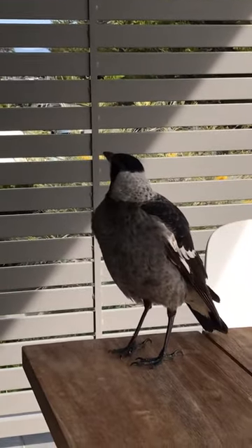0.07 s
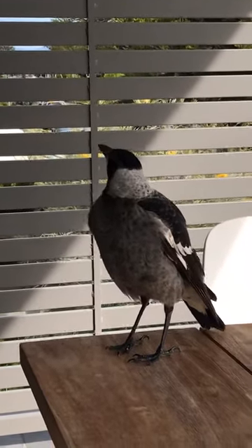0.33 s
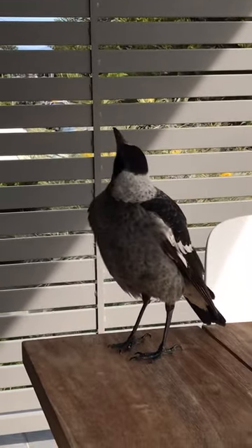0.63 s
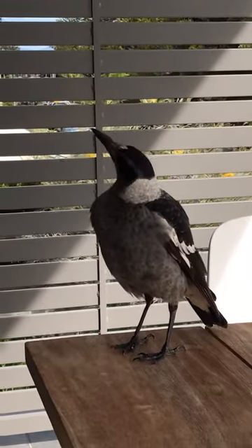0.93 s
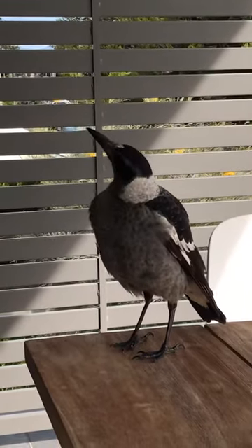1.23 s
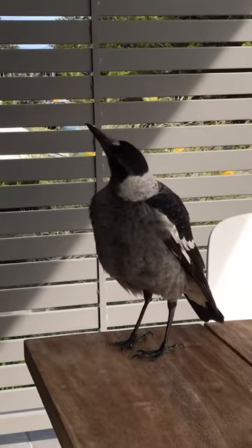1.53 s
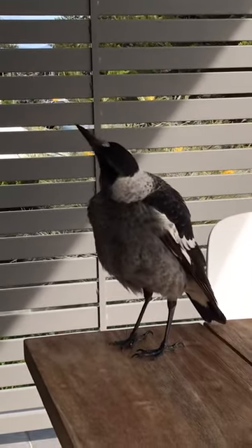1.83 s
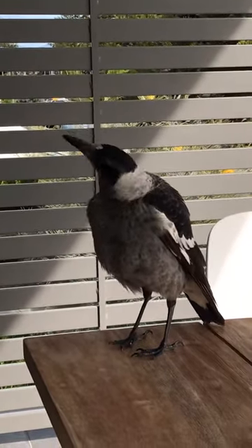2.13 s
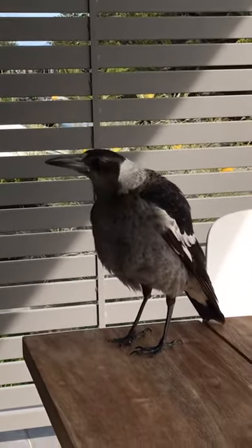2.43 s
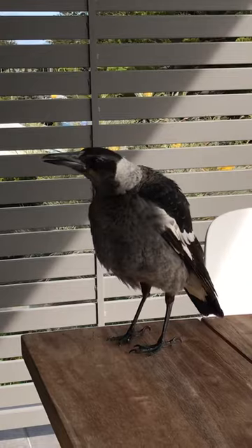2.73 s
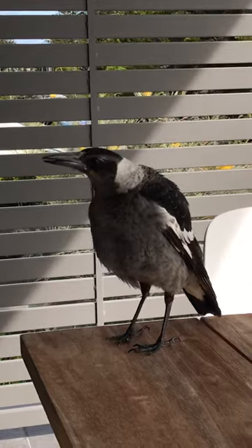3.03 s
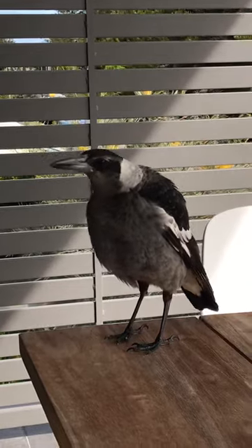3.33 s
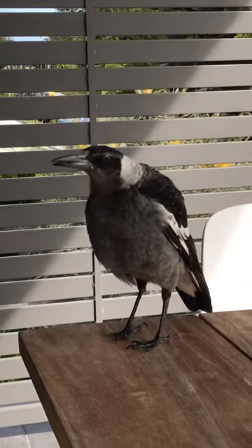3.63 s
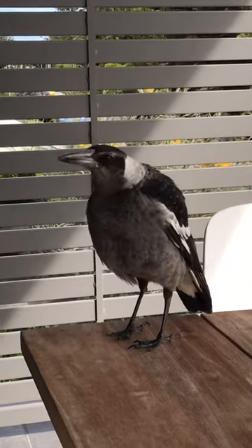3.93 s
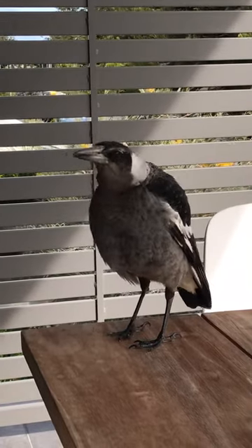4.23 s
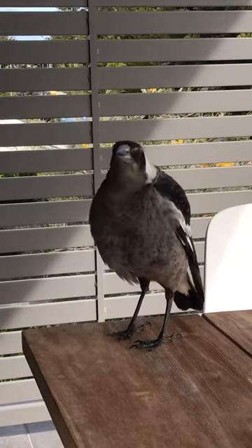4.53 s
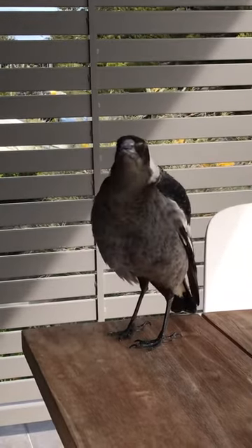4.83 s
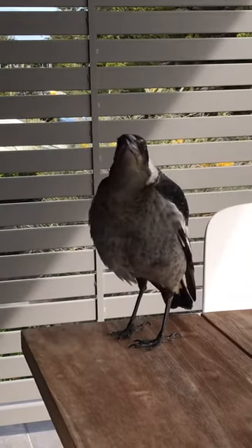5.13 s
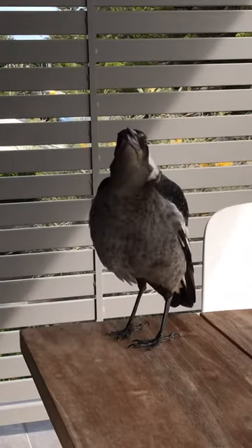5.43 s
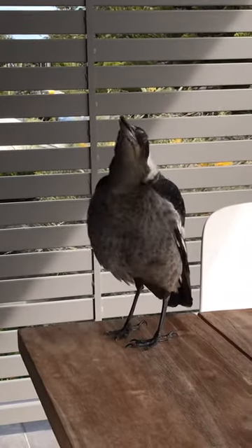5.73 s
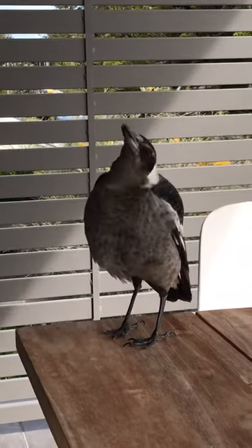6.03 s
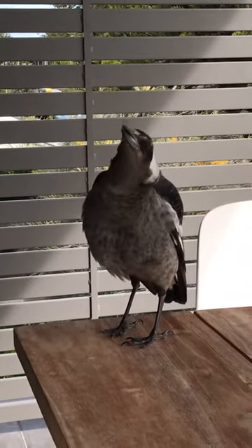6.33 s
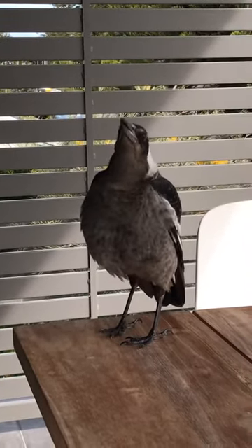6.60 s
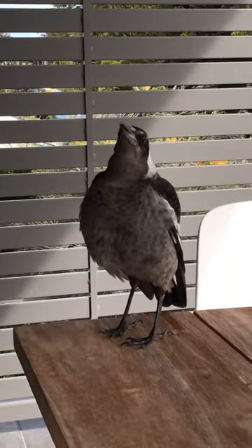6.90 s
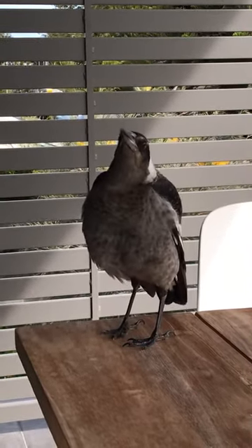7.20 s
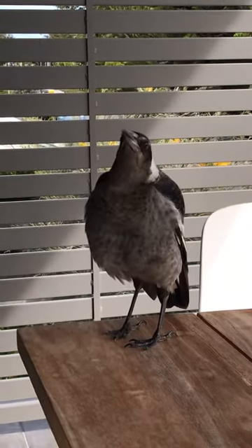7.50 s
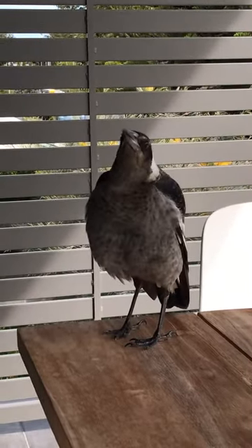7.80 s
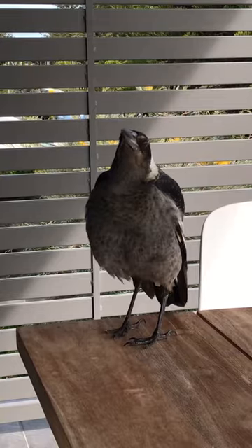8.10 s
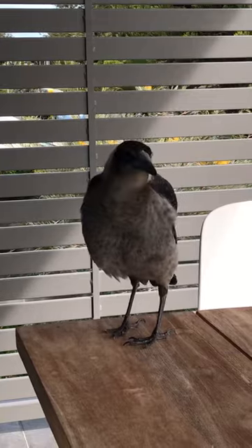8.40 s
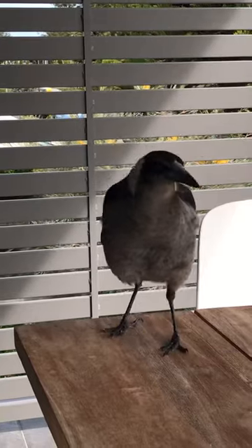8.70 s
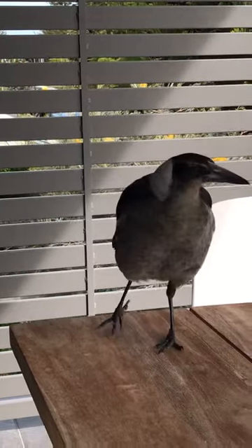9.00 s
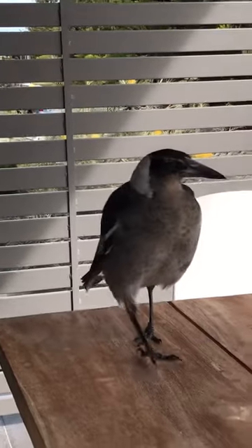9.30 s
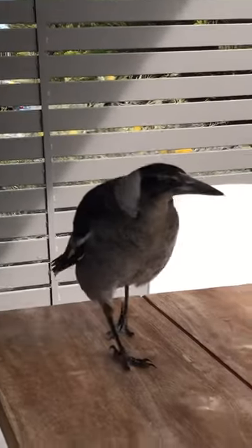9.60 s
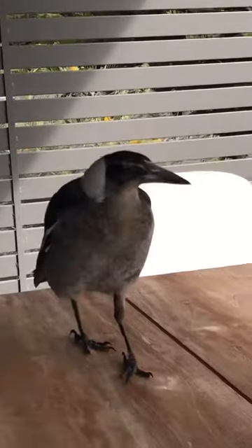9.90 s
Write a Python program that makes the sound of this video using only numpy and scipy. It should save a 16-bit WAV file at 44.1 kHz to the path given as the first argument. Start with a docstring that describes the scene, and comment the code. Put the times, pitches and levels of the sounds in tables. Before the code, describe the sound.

A magpie sings close by on a porch, over a steady low outdoor rumble with faint hiss. It starts with soft, broken warbles and a few held notes, with one dry tick of the beak. A trill leads into louder, buzzy, fluttering calls, then a whistle, a short yelp and a falling note. The song has a short echo and stops, leaving only the background.

```python
"""A magpie carols on a wooden porch table: soft broken warbles that grow into louder, buzzy calls.
The two sides of its voice box (the syrinx) sing in turn or together, each a nearly pure tone that
flutters. An open beak lets out the overtones, the higher tones that make a note bright.
Beak and claws tick, the slatted porch adds a short echo, and a low outdoor rumble with a little
hiss lies under it all."""
import sys
import numpy as np
from scipy import signal
from scipy.fft import rfft, irfft, next_fast_len
from scipy.io import wavfile
from scipy.ndimage import map_coordinates

SR = 44100
rng = np.random.default_rng(int(sys.argv[2]) if len(sys.argv) > 2 else 0)


def file_out(sig):
    """Save sig as 16-bit WAV at sys.argv[1]."""
    # one column per channel
    cols = np.atleast_2d(sig).T
    # limit, then scale
    lim = np.clip(cols, -1, 1)
    pcm = np.round(lim * 32767).astype(np.int16)
    wavfile.write(sys.argv[1], SR, pcm)


N = 438794
TIME = np.arange(N) / SR
TOP_HZ = 15700  # where the treble ends

# The outdoor background. Each row: frequency in Hz, relative level in dB.
AIR_COLOUR = [(22, -22.5), (48, -14.5), (63, -4), (74, 1), (92, -9), (120, -9.5), (180, -18), (450, -25),
              (900, -22.5), (2000, -33.5), (9000, -53.5), (10400, -60), (12000, -56.5), (15700, -63.5)]
# How it eases off. Each row: time in seconds, boost in dB.
AIR_FADE = [(0, 4.5), (2.5, 3), (9, 2)]
# The soft notes. Each row: start and length in seconds, pitch in Hz, relative level in dB.
WARBLES = [(1.723, .065, 1010, -38), (1.807, .05, 1320, -37.5), (1.875, .105, 1075, -35.5),
           (2.009, .03, 740, -37), (2.024, .056, 1080, -35), (2.075, .048, 780, -34.5),
           (2.184, .03, 1160, -38), (2.205, .062, 810, -38), (2.261, .058, 1005, -35.5),
           (2.27, .054, 725, -35), (2.701, .029, 1448, -22.5), (2.974, .085, 845, -31.5),
           (3.172, .055, 815, -29), (3.238, .024, 820, -29.5), (3.266, .038, 1295, -33),
           (3.3, .072, 1100, -33), (3.374, .063, 745, -35), (3.442, .042, 800, -26.5),
           (3.484, .066, 975, -30), (3.589, .023, 1070, -24.5), (3.613, .057, 1185, -32.5),
           (3.67, .095, 800, -36.5), (3.785, .037, 1110, -29), (3.822, .053, 1205, -31),
           (3.885, .021, 1035, -25), (3.906, .036, 945, -34.5), (4.222, .051, 875, -29),
           (4.273, .029, 750, -37), (4.309, .072, 1140, -34), (4.382, .069, 720, -30),
           (4.457, .093, 785, -40.5), (4.551, .05, 1075, -29), (4.565, .073, 1305, -32),
           (4.626, .072, 920, -34), (5.813, .057, 755, -37.5), (6.497, .038, 1410, -30.5),
           (6.857, .06, 943, -30.5), (6.924, .043, 775, -37)]
# The resting throat. Each row: frequency in Hz, overtone gain in dB with the beak open, then shut.
THROAT_COLOUR = [(1795, -3.5, -27.5), (2320, -28, -33.5), (3250, -29.5, -35.5), (4164, -4, -34.5),
                 (5030, -37, -49.5), (6390, -26, -43), (7720, -50, -62), (8520, -37.5, -41),
                 (10730, -49, -66.5), (12400, -29.5, -45.5), (13100, -36, -51), (14700, -62, -49)]
# Sheen is a boost or cut of the top overtones. Each row: frequency in Hz, share of it from 0 to 1.
SHEEN_SHARE = [(6800, 0), (8500, 1)]
# The extra tones made when both sides sing at once. Each row: frequency in Hz, gain in dB.
CLASH_COLOUR = [(1300, -27.5), (2100, -5.5), (2600, 0.5), (4600, -3), (7000, -13)]
# The porch echo. Each row: frequency in Hz, seconds it takes to fade by 60 dB.
ECHO_DECAY = [(1200, 0.55), (4500, 0.36), (12000, 0.084)]
# The long calls. Each row: time in seconds, relative level in dB, pitch in Hz,
# brightness in dB (which sets how far the beak opens).
HELD = [(2.32, -32.5, 999, -41), (2.378, -27, 987, -30.5), (2.482, -28, 1013, -23.5),
        (2.538, -34.5, 1006, -26), (2.598, -25.5, 1006, -29.5), (2.63, -51, 1015, -25)]
HIGH_BUZZ = [(2.73, -40.5, 1447, -15.5), (2.738, -31, 1442, -25.5), (2.792, -31.5, 1350, -25),
             (2.952, -30, 1294, -23), (2.975, -47, 1316, -33.5)]
TRILL = [(4.69, -39, 1308, -25), (4.73, -24.5, 1293, -25), (4.78, -35, 1239, -21), (4.848, -27, 1227, -20),
         (4.976, -29.5, 1114, -24.5), (5.0, -45, 1128, -25.5)]
LOUD_CALL = [(5.11, -32.5, 1080, -44), (5.132, -53, 1090, -22), (5.162, -21, 1076, -37),
             (5.178, -19, 1066, -41), (5.194, -41, 1058, -31), (5.216, -17, 1064, -29.5),
             (5.246, -19.5, 1067, -18), (5.31, -19, 1051, -21), (5.4, -26.5, 1048, -11.5),
             (5.432, -21, 1035, -21.5), (5.478, -29.5, 1079, -19.5), (5.508, -26.5, 1078, -21),
             (5.59, -39.5, 1045, -11)]
LOUD_UPPER = [(5.44, -38, 1540, -8), (5.498, -33, 1570, -11), (5.586, -25, 1479, -25),
              (5.63, -34, 1470, -26.5), (5.64, -36, 1480, -21.5)]
PEAK_CALL = [(5.62, -34.5, 1114, -29), (5.672, -20.5, 1100, -9), (5.734, -20.5, 1089, -7),
             (5.76, -22, 1067, -19.5), (5.775, -24, 1075, -24)]
WHISTLE = [(6.045, -40, 1168, -30), (6.061, -33.5, 1184, -25), (6.119, -28.5, 1167, -26.5),
           (6.2, -40.5, 1112, -25.5)]
PURR = [(6.315, -36, 1079, -36), (6.341, -24, 1079, -27), (6.455, -28, 1081, -26), (6.47, -34, 1081, -14.5)]
FALL = [(6.51, -18.5, 1040, -15.5), (6.54, -21, 1039, -18.5), (6.644, -19.5, 906.5, -28),
        (6.666, -28.5, 910.6, -28.5), (6.756, -24, 910.4, -40), (6.85, -40, 860, -28.5)]
FALL_UPPER = [(6.52, -58, 1854, -36), (6.648, -39, 1634, -22), (6.73, -52, 1620, -29)]
# How each call is sung. Each row: its table, flutter rate in Hz, flutter depth from 0 to 1 with
# the beak wide open, throat tuning (1 is at rest), sheen in dB.
CALLS = [(HELD, 124, .58, 0.95, -1.3), (HIGH_BUZZ, 117, .85, 0.947, -5), (TRILL, 72, .7, 0.926, 0),
         (LOUD_CALL, 132, 0.377, .98, -5.5), (LOUD_UPPER, 76, 0.573, 0.98, 1),
         (PEAK_CALL, 153, 0.5, 1, 4.4), (WHISTLE, 57, 0.094, 0.93, -3), (PURR, 82, 0.2, 0.97, -7),
         (FALL, 78, 0.735, 0.98, 7.8), (FALL_UPPER, 63, 0.374, 0.74, 0)]
# Bright squeaks inside the notes. Each row: time in seconds, frequency in Hz, boost in dB.
SQUEAKS = [(2.585, 4107, 6), (3.01, 6400, 17), (3.5, 8200, 18), (3.895, 8600, 14), (6.88, 5740, 20)]
# Dry ticks of beak and claws. Each row: start in seconds, relative level in dB.
TICKS = [(4.112, -23), (9.711, -48)]
# Their tone. Each row: frequency in Hz, gain in dB.
TICK_COLOUR = [(1500, -31), (4500, -3), (15000, -34)]
# One clean yelp. Each row: time in seconds, pitch in Hz, relative level in dB.
YELP = [(6.462, 829, -42), (6.475, 905, -26), (6.491, 936, -24), (6.518, 916, -44)]
# The gain in dB of each tone in the yelp, from the lowest up.
YELP_HARMONICS = [-6, 2.5, -24, -13.5, -11.5, -22.5, -32, -40, -21.5, -32, -40, -38, -38]


def amp(db):
    """Turns decibels into a number to multiply by."""
    return 10 ** (np.asarray(db) / 20)


def unit(x):
    """Scales a signal to an average size (rms) of 1."""
    return x / np.sqrt(np.mean(x ** 2) + 1e-20)


def look_up(points, hz):
    """Reads between the rows of a table, giving every octave equal room."""
    f, value = np.transpose(points)
    return np.interp(np.log(hz + 1), np.log(f), value)


def colour(x, points):
    """Turns each frequency up or down by a table of Hz and dB."""
    size = next_fast_len(len(x) + 4096)
    gain = amp(look_up(points, np.fft.rfftfreq(size, 1 / SR)))
    return irfft(rfft(x, size) * gain, size)[:len(x)]


def lowpass(hz):
    """A filter that keeps what lies below hz."""
    return signal.butter(2, hz, fs=SR, output="sos")


def wander(hz):
    """A smooth random wobble, moving up to about hz times a second."""
    return unit(signal.sosfilt(lowpass(hz), rng.standard_normal(N)))


def bump(x, width):
    """A smooth hill of height 1 around zero."""
    return np.exp(-(x / width) ** 2 / 2)


def outdoors(gain_db=-43, waver_db=.43):
    """A low rumble and a faint, wavering hiss ease off together."""
    air = unit(colour(rng.standard_normal(N), AIR_COLOUR))
    rumble = signal.sosfiltfilt(lowpass(220), air)
    hiss = (air - rumble) * amp(waver_db * wander(3.9))
    return (rumble + hiss) * amp(gain_db + np.interp(TIME, *np.transpose(AIR_FADE)))


def warble(start, length, hz, level_db, flutter_hz=107.2, easy_db=-32.5, open_db=-11, open_hz=1052.3):
    """One push of air shapes a note: a strong one rises and rings clean, a weak one sags and flutters."""
    push_db = level_db - easy_db
    glide = min(.011 * push_db, .06) / 2
    depth = np.clip(.52 - .08 * push_db, 0, .56) * np.sqrt(open_hz / hz)  # low notes flutter more
    beak = amp(level_db - open_db) * (hz / open_hz) ** 2  # opens for loud and high notes
    place = np.linspace(-1, 1, 7)  # from the note's start to its end
    times = start + length * (place + 1) / 2
    arched_db = level_db + .5 * (1 / 3 - place ** 2)
    pitch = hz * (1 + glide * place)
    return np.column_stack(np.broadcast_arrays(times, arched_db, pitch, flutter_hz, depth, beak, 1, 0))


def share_notes(notes):
    """Each note goes to the side of the syrinx that is free first."""
    resting, other = [], []
    for note in sorted(notes, key=lambda note: note[0, 0]):
        resting.append(note)
        if not other or other[-1][-1, 0] < note[-1, 0]:
            resting, other = other, resting
    return resting, other


def join_notes(notes, edge_s=.014):
    """Joins one side's notes into curves: loudness first, then the other controls of the voice."""
    loudness = sum(np.interp(TIME, note[:, 0], amp(note[:, 1]), left=0, right=0) for note in notes)
    ramp = signal.windows.hann(round(2 * edge_s * SR))
    loudness = signal.oaconvolve(loudness, ramp / ramp.sum(), "same")
    times, _, *controls = np.transpose(sorted(map(tuple, np.vstack(notes))))
    return loudness, *(np.interp(TIME, times, control) for control in controls)


def syrinx(notes, throb=.95, bend=.135, lag_radians=1.9, steady_db=-19, pure_db=14):
    """On one side of the voice box a thin skin vibrates, fluttering in strength and pitch together."""
    loudness, pitch, flutter_hz, depth, beak, tuning, sheen_db = join_notes(notes)
    depth, beak = np.clip(depth, 0, 1), np.clip(beak, 0, 1)
    # Loud notes with an open beak flutter more evenly.
    uneven = depth * (1 - .739 * beak) / (1 + (loudness / amp(steady_db)) ** 2)
    flutter = 2 * np.pi * np.cumsum(flutter_hz * (1 + .55 * uneven * wander(50.2))) / SR
    swing = bend * depth * np.cos(flutter - lag_radians)
    hz = pitch * (1 + swing + .07 * uneven * wander(108.5) + .00396 * wander(27.35))
    phase = 2 * np.pi * np.cumsum(hz) / SR + .12 * depth * wander(430)  # jitter frays high overtones
    pulsing = 1 + throb * depth * np.cos(flutter) + .55 * uneven * wander(195)
    strength = np.sqrt(2) * loudness * pulsing / np.sqrt(1 + (throb * depth) ** 2 / 2)
    singing, overtones = loudness > 1e-6, np.zeros(N)
    overtones[singing] = sum(np.cos(k * phase[singing]) * (k * hz[singing] < TOP_HZ)
                             for k in range(2, 22))
    overtones += 2.9 * np.sqrt(depth * beak) * rng.standard_normal(N)  # forced air rasps
    calm = np.maximum(1 - 2 * (depth + beak), 0)  # calm notes with a shut beak are almost pure
    overtones *= strength * amp(-pure_db * calm)
    main_tone = tuned_cavity(strength * np.exp(1j * phase), pitch)
    return main_tone + throat(overtones, pitch, beak, tuning, sheen_db)


def tuned_cavity(tone, pitch, reach_hz=340, below_hz=75):
    """The bird keeps the hollow of its throat tuned just under the pitch, which softens the flutter."""
    centre = np.exp(2j * np.pi * np.cumsum(pitch - below_hz) / SR)
    return (centre * signal.sosfiltfilt(lowpass(reach_hz), tone / centre)).real


def throat(overtones, pitch, beak, tuning, sheen_db, rest_hz=1060, glint_db=5.5, glint_hz=11000):
    """Throat and beak favour some overtones; their peaks slide with the pitch and shift restlessly."""
    f, t, spectrum = signal.stft(overtones, SR, nperseg=256, noverlap=192)
    hz = f[:, None]
    curves = pitch, beak, tuning, sheen_db, wander(5.7)
    pitch, beak, tuning, sheen_db, drift = (np.interp(t, TIME, curve) for curve in curves)
    stretch = tuning * (pitch / rest_hz) ** .25 * (1 + .06 * (1 - beak) ** 2 * drift)
    table_hz, table = hz / stretch, np.array(THROAT_COLOUR)
    open_db, shut_db = look_up(table[:, [0, 1]], table_hz), look_up(table[:, [0, 2]], table_hz)
    gain_db = beak * open_db + (1 - beak) * shut_db
    gain_db += glint_db * glints(t, table_hz) * (1 - beak / 2) * np.minimum(hz / glint_hz, 1)
    gain_db += squeak_db(t, hz) + sheen_db * look_up(SHEEN_SHARE, hz)
    above_pitch = np.clip(hz / pitch - 1, 0, 1)
    return signal.istft(spectrum * amp(gain_db) * above_pitch, SR, nperseg=256, noverlap=192)[1][:N]


def glints(t, hz, life_s=.11, width_hz=620):
    """Narrow random peaks and dips come and go, so the overtones flicker."""
    grid = rng.standard_normal((64, round(N / SR / life_s) + 2))
    places = np.broadcast_arrays(hz / width_hz, t / life_s)
    return unit(map_coordinates(grid, places, order=2, mode="mirror"))


def carol(clash_db=9):
    """Both sides share one airflow, so singing together they also make hoarse extra tones."""
    notes = [warble(*row) for row in WARBLES] + [long_call(*row) for row in CALLS]
    left, right = (syrinx(side) for side in share_notes(notes))
    return left + right + amp(clash_db) * colour(left * right, CLASH_COLOUR)


def porch_echo(x, echo_db=-10, gap_s=.0024, early_s=.06):
    """Slats, table and roof scatter the song into many tiny echoes; the treble dies first."""
    echoes, slots = np.zeros(SR), np.arange(0, SR - 20, 20)
    echoes[slots + rng.integers(0, 20, len(slots))] = rng.choice([-1., 1.], len(slots))
    hz, t, spectrum = signal.stft(echoes, SR, nperseg=256)
    fade = amp(-60 * t / look_up(ECHO_DECAY, hz)[:, None])
    tail = signal.istft(spectrum * fade, SR, nperseg=256)[1]
    age = TIME[:len(tail)]
    tail *= np.clip(age / gap_s - 1, 0, 1) * (1 + np.exp(-age / early_s))  # a gap, then a strong start
    return amp(echo_db) * signal.fftconvolve(x, tail / np.linalg.norm(tail))[:N]


def long_call(curve, flutter_hz, open_depth, tuning, sheen_db, shut_db=-34, open_db=-11.5):
    """A long call brightens as the beak opens, and its flutter deepens with it."""
    times, level_db, pitch, bright_db = np.transpose(curve)
    beak = np.clip((bright_db - shut_db) / (open_db - shut_db), 0, 1)
    depth = open_depth * (.456 + .544 * beak)
    controls = np.broadcast_arrays(times, level_db, pitch, flutter_hz, depth, beak, tuning, sheen_db)
    return np.column_stack(controls)


def squeak_db(t, hz, width_s=.02, width_hz=320, spill=.3):
    """In a squeak one overtone flares for a moment, and those above it brighten a little."""
    return sum(db * bump(t - at_s, width_s) * np.maximum(bump(hz - at_hz, width_hz), spill * (hz > at_hz))
               for at_s, at_hz, db in SQUEAKS)


def ticks(decay_s=.0055):
    """Beak and claws make tiny bright snaps that die away at once."""
    bursts = sum(amp(db) * (TIME >= start) * np.exp(-abs(TIME - start) / decay_s) for start, db in TICKS)
    return colour(bursts * rng.standard_normal(N) / 2, TICK_COLOUR)


def rasp(at_s=5.54, width_s=.062, level_db=-47, band_hz=(1800, 2800), grain_hz=107.2):
    """Between two loud calls the voice breaks up into a grainy rasp."""
    band = signal.butter(2, band_hz, "bandpass", fs=SR, output="sos")
    noise = unit(signal.sosfilt(band, rng.standard_normal(N)))
    grain = 1 + .5 * wander(grain_hz)
    return amp(level_db) * bump(TIME - at_s, width_s) * noise * grain


def yelp():
    """The voice cracks upward into a short clean yelp, strongest an octave above its pitch."""
    times, hz, level_db = np.transpose(YELP)
    phase = 2 * np.pi * np.cumsum(np.interp(TIME, times, hz)) / SR
    strength = amp(np.interp(TIME, times, level_db)) * (TIME > times[0]) * (TIME < times[-1])
    tone = sum(amp(db) * np.cos(k * phase) for k, db in enumerate(YELP_HARMONICS, 1))
    return np.sqrt(2) * strength * tone


def scene(song_db=-.58):
    """The bird close by, its echo and the outdoor background, in one channel."""
    bird = amp(song_db) * carol() + rasp() + yelp() + ticks()
    return (bird + porch_echo(bird) + outdoors())[None]


def record(dry):
    """Cuts away the very highest treble."""
    treble_cut = signal.firwin(511, TOP_HZ, window=("kaiser", 9), fs=SR)
    return signal.oaconvolve(dry, treble_cut[None], "same")


dry = scene()
out = record(dry)
file_out(out)
```